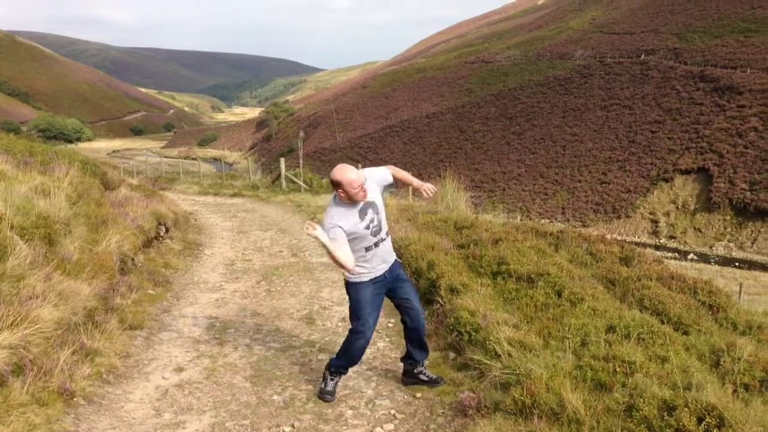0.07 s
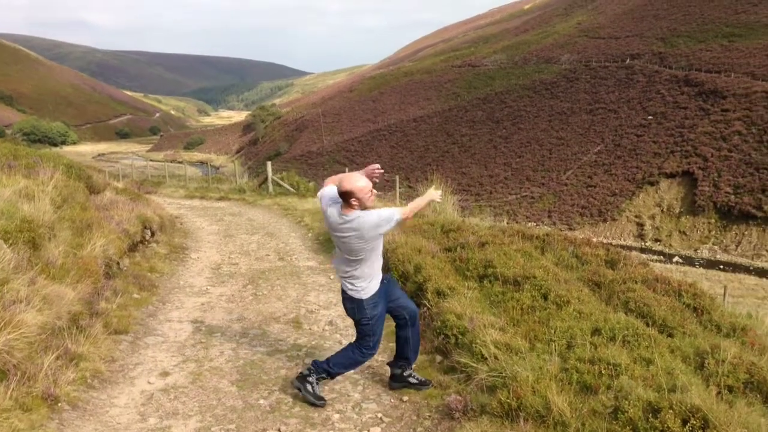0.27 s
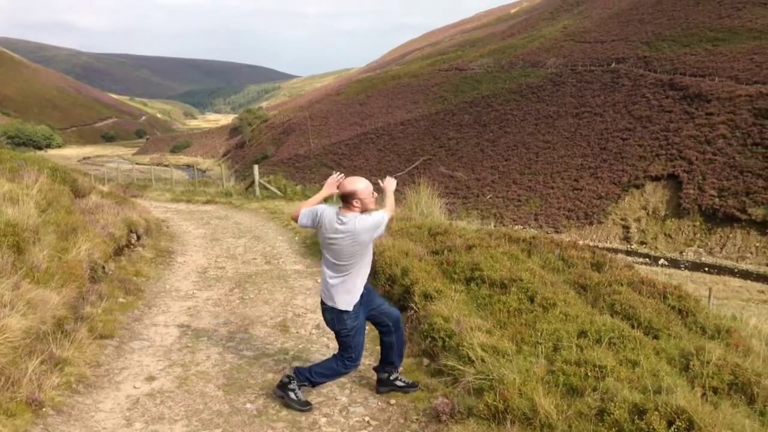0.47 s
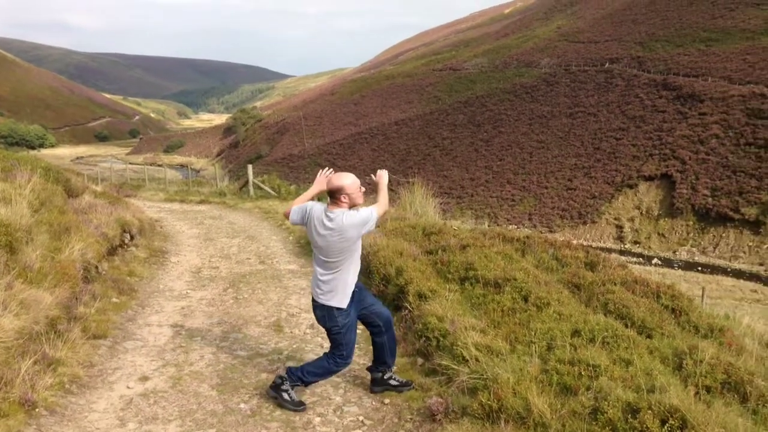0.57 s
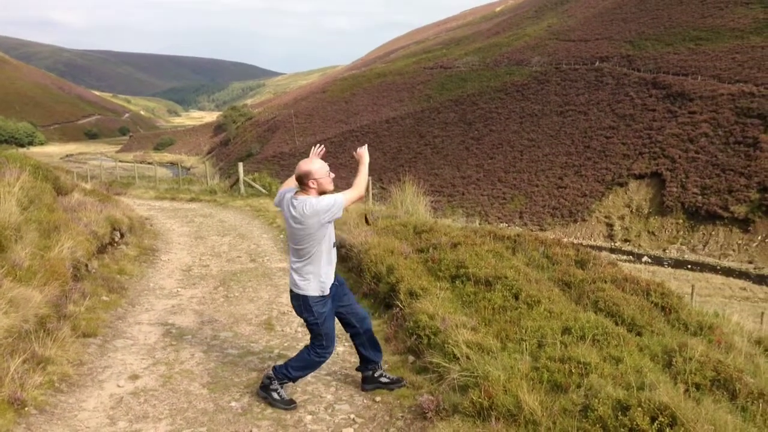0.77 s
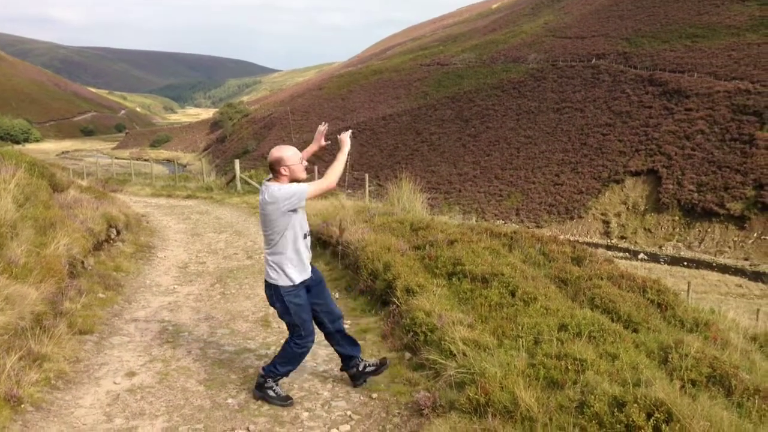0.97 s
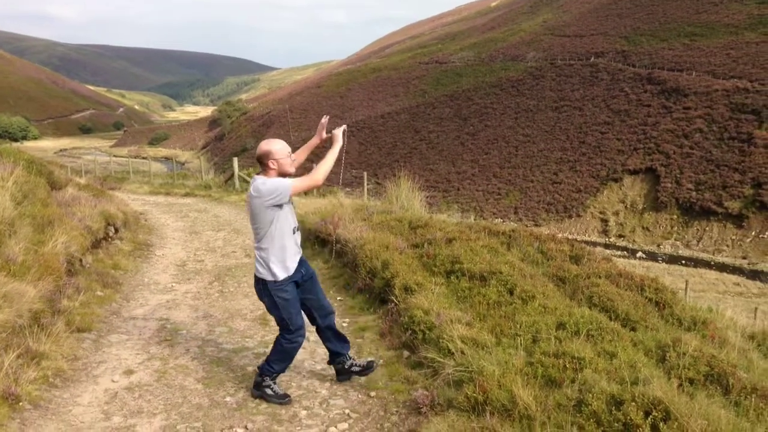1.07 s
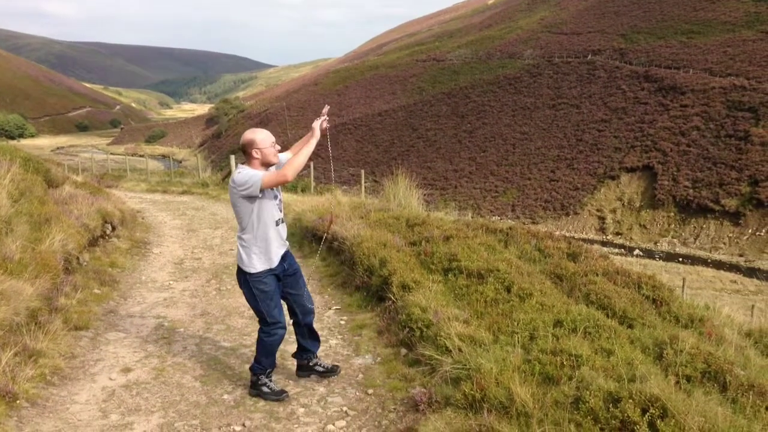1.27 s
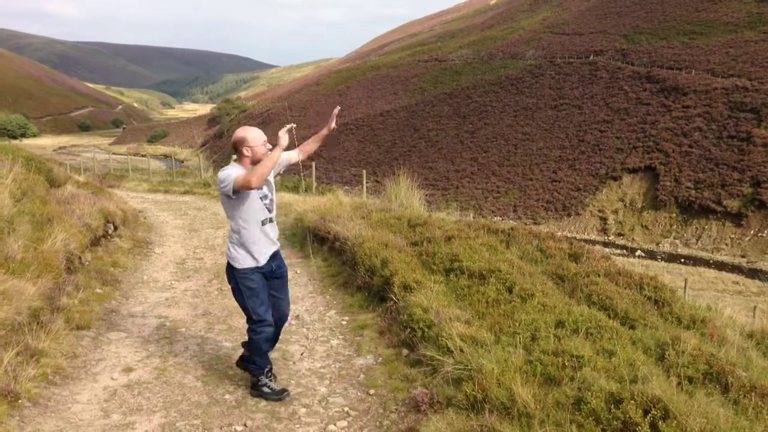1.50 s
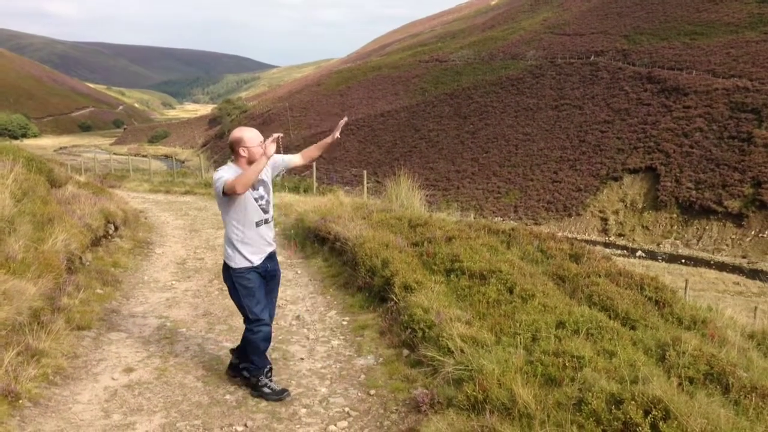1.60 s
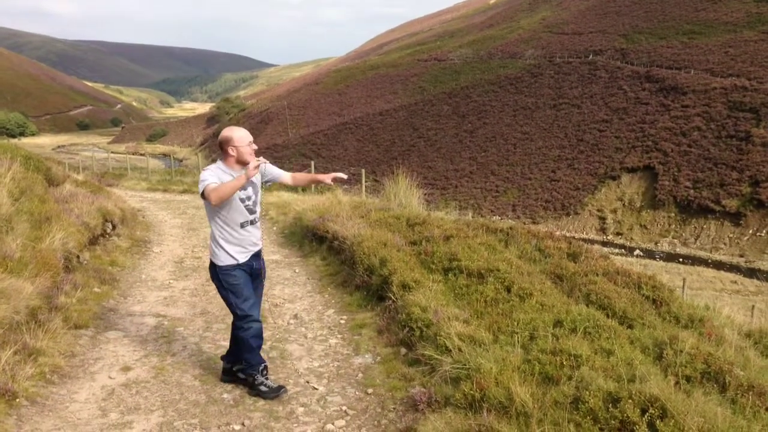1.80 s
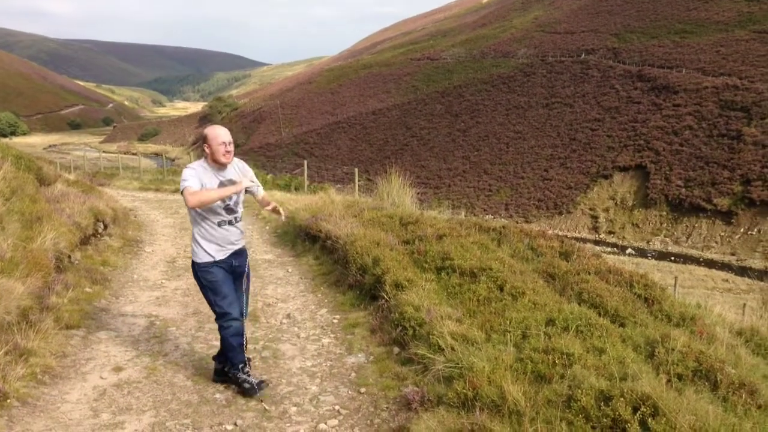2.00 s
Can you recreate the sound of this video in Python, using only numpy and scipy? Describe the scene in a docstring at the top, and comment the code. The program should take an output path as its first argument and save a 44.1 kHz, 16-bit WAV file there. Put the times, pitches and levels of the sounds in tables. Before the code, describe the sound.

The quick whoosh and sharp crack of a sling released outdoors in light wind.

```python
"""Wind hisses in the heather and rumbles low on an open moor, from start to end.
A few metres away a sling is whipped round once and let go. Its cords snap taut and rush through
the air, the pouch whooshes past, the freed cord hisses and, a third of a second in, its tip cracks.
The ground and slopes scatter these sounds. Later, stones knock twice and the wind gusts."""
import sys
import numpy as np
from scipy import signal
from scipy.fft import rfft, irfft
from scipy.io import wavfile

SR = 44100
rng = np.random.default_rng(int(sys.argv[2]) if len(sys.argv) > 2 else 0)


def materialize(psi):
    """Save the field psi as 16-bit PCM at rate SR to the path in sys.argv[1].

    A 1-D psi becomes a single channel; in a 2-D psi each row is a channel.
    """
    bounded = np.clip(np.atleast_2d(psi).T, -1, 1)
    quanta = np.round(bounded * 32767).astype(np.int16)
    wavfile.write(sys.argv[1], SR, quanta)


N = 90404
T = np.arange(N) / SR
SIZE = 2 * N
FREQ = np.maximum(np.arange(N + 1) * SR / SIZE, 1)


def undb(db):
    """Turns decibels into a gain to multiply by."""
    return 10 ** (np.asarray(db) / 20)

def colour(points):
    """Tone colour: a gain for every frequency, from rows of f/Hz, level/dB."""
    hz, db = np.array(points, float).T
    return undb(np.interp(np.log(FREQ), np.log(hz), db))

def band(hz, octaves):
    """A colour that keeps only what is near one pitch."""
    return 1 / (1 + (np.log2(FREQ / hz) / octaves) ** 2) ** 2

def low_cut(hz):
    """A colour that removes the bass."""
    return 1 / (1 + (hz / FREQ) ** 4)

def noise(gain):
    """Coloured noise, scaled to level 1."""
    x = irfft(rfft(rng.standard_normal(SIZE)) * gain)[:N]
    return x / x.std()

def ring(x, gain):
    """Colours a sound so that it rings after each push, never before."""
    cepstrum = irfft(np.log(gain + 1e-9))
    cepstrum[1:N] *= 2
    cepstrum[N + 1:] = 0
    return irfft(rfft(x, SIZE) * np.exp(rfft(cepstrum)))[:N]

def wobble(hz):
    """A smooth random wobble; more Hz is faster."""
    return noise(np.exp(-(FREQ / hz) ** 2))

def pulse(at):
    """One sharp push."""
    return 1. * (np.arange(N) == int(at * SR))

def burst(at, rise_s, fade_s):
    """A level that rises to a point and fades."""
    return np.exp(-np.maximum((at - T) / rise_s, (T - at) / fade_s))

def swell(at, half_s, steep=2):
    """The bell-shaped level of something flying past."""
    return np.exp(-.5 * np.minimum(np.abs((T - at) / half_s), 20) ** steep)


# colours of the heather's hiss and the low rumble: f/Hz, level/dB
HISS_COLOUR = [(240, -50), (400, -11.5), (560, -15.5), (715, -2.5), (987, 1), (1170, -1), (1340, -1),
               (1690, -2), (2290, -7), (3510, -5), (4160, -9.5), (5230, -21.5), (8400, -24.5),
               (13300, -26.5), (15500, -28)]
RUMBLE_COLOUR = [(25, -48), (50, -44), (80, -27.5), (100, -17.5), (120, -3.5), (140, 0.5), (175, -7.5),
                 (230, -13), (300, -21), (400, -23.5), (600, -37), (2500, -95)]
# how the gusts rise and fall: t/s, level/dB
GUST_LEVELS = [(0, -69), (.5, -64), (.8, -87), (1.15, -69), (1.38, -56.5), (1.51, -54), (1.58, -61.5),
               (1.7, -57.5), (1.88, -56.5), (2.05, -60)]

def wind():
    """Wind hisses evenly in the heather over a fluttering rumble; gusts add a higher band."""
    hiss = noise(colour(HISS_COLOUR) * low_cut(300)) * undb(-58.5)
    rumble = noise(colour(RUMBLE_COLOUR)) * undb(-57.5 + 1.7 * wobble(11.7))
    gust_db = np.interp(T, *np.array(GUST_LEVELS).T)
    return hiss + rumble + noise(band(261.9, octaves=.27)) * undb(gust_db)


# small snaps: t/s, level/dB, brightness/(dB per octave), half the tail's fade time/s
CORD_SNAPS = [(.016, -53.5, 2, 0.005), (.042, -53, -0.5, 0.0036), (.2044, -28, 0, 0.00075),
              (0.2124, -42, 1.5, 0.00062), (0.2221, -37, 1, 0.0017), (0.2439, -47, -4.5, 0.0037),
              (.4025, -49, 7, .001)]
# their shared colour: f/Hz, level/dB
SNAP_COLOUR = [(300, -17), (700, -8), (1200, 2.5), (2300, 2), (3200, -13), (3900, -1), (5800, -29),
               (7500, -14), (9000, -28), (15000, -21)]

def snaps():
    """Cord and gear snap taut, each time with a click and a short gritty tail."""
    out = 0
    for at, db, brightness, half_fade in CORD_SNAPS:
        gain = colour(SNAP_COLOUR) * undb(brightness * np.log2(FREQ / 2000)) * low_cut(300)
        gain /= np.sqrt(np.mean(gain ** 2))
        click = pulse(at) * np.sqrt(half_fade * SR)
        grit = .69 * rng.standard_normal(N) * burst(at, half_fade / 10, 2 * half_fade)
        out += undb(db) * ring(click + grit, gain)
    return out


# rushes of air: middle t/s, half length/s, edge steepness, level/dB,
# top edge f/Hz, fall above it/(dB per octave), bottom edge f/Hz
AIR_RUSHES = [(0.194, 0.066, 1.1, -56.5, 2470, 13, 700), (0.223, 0.021, 2.4, -49, 2210, 8.5, 610),
              (0.27, 0.0074, 1.6, -40, 2200, 15.5, 700), (0.3, 0.023, 2.3, -44, 2500, 6, 350)]
# colour of the freed cord's lash: f/Hz, level/dB
LASH_COLOUR = [(90, -24), (160, 4), (300, 2), (560, -9), (1000, 1.5), (1550, 3), (2100, -14), (2550, -2),
               (3150, -8), (5500, -1), (6700, -8.5), (10800, -12), (15000, -15)]

def cords():
    """Air swirls behind the cords; they sizzle as they pull tight, then the freed end lashes."""
    rushes = 0
    for at, half_s, steep, db, top_hz, fall, bottom_hz in AIR_RUSHES:
        high_cut = undb(-fall * np.log2(np.hypot(1, FREQ / top_hz)))
        rushes += undb(db) * swell(at, half_s, steep) * noise(high_cut * low_cut(bottom_hz))
    sizzle = undb(-57.5) * swell(at=.221, half_s=.023, steep=4) * noise(band(7340, octaves=.13))
    lash = undb(-33) * swell(at=.3015, half_s=.0065, steep=3.9) * noise(colour(LASH_COLOUR))
    return rushes + sizzle + lash


def pouch(at=.2685, pitch_hz=945, octaves_per_s=-2):
    """Whirls of air peel off the pouch, making a shaky, sinking tone inside a breathy wake."""
    glide = 2 ** (octaves_per_s * np.clip(T - at, -.1, .1))
    hz = pitch_hz * glide * (1 + .041 * wobble(210))
    tone = np.sqrt(2) * np.sin(2 * np.pi * np.cumsum(hz) / SR)
    tone *= undb(-36 + 1.1 * wobble(180))
    wake = undb(-48) * noise(band(900, octaves=.23))
    return tone * swell(at, half_s=.0062) + wake * swell(at, half_s=.0079)


# colours of the tip's crack and the frayed end's fizz: f/Hz, level/dB
CRACK_COLOUR = [(30, -28.5), (90, -19), (125, 0), (210, 6), (310, -1), (420, -0.5), (750, -1), (1150, -16),
                (1750, -9.5), (2150, -26), (2750, -19), (3300, -11.5), (4500, -11.5), (5200, -27),
                (6500, -27), (8000, -18.5), (15000, -36)]
FIZZ_COLOUR = [(200, 1), (800, 2), (4000, -3.5), (7000, -4.5), (15000, -9)]

def crack(at=.3253, bounce_delay_s=.0042):
    """The tip makes a shock wave that bounces dully off the ground; the frayed end fizzes."""
    shock = -undb(13) * ring(pulse(at), colour(CRACK_COLOUR))
    delayed = np.roll(shock, int(bounce_delay_s * SR))
    bounce = ring(delayed, undb(-12) / np.hypot(1, FREQ / 700))
    fizz = undb(-25) * burst(at, rise_s=.001, fade_s=.0021) * noise(colour(FIZZ_COLOUR))
    return shock + bounce + fizz


# colours of the echoes from the nearby ground and the far slopes: f/Hz, level/dB
GROUND_COLOUR = [(80, -17), (200, -12.5), (380, -6), (600, -16), (1500, -14), (5000, -9), (15000, -11)]
SLOPE_COLOUR = [(80, -24), (150, -14.5), (250, -6), (400, -15.5), (600, -19.5), (1500, -17.5),
                (5000, -17.5), (15000, -12.5)]

def scatter(sound, ground_fade_s=.015, slope_fade_s=.091):
    """Many tiny echoes blur together, so each octave lingers as fading noise."""
    out = 0
    for points, fade_s in (GROUND_COLOUR, ground_fade_s), (SLOPE_COLOUR, slope_fade_s):
        spectrum = rfft(sound, SIZE) * colour(points)
        keep = np.exp(-2 / (fade_s * SR))  # share of energy left after one sample
        for hz in 125 * 2. ** np.arange(8):
            octave = np.cos(np.pi / 2 * np.clip(np.log2(FREQ / hz), -1, 1))
            energy = irfft(spectrum * octave)[:N] ** 2
            lingering = signal.lfilter([1 - keep], [1, -keep], energy)
            out += np.sqrt(lingering) * noise(octave * colour(points))
    return out


# knocks of stones: t/s, level/dB
STONE_KNOCKS = [(1.131, -18), (1.4078, -29)]
# their colour: f/Hz, level/dB
STONE_COLOUR = [(300, -27), (550, -13), (800, 3.5), (1500, -1.5), (3400, -1.5), (4300, -12), (5200, -24),
                (6400, -20), (7500, -34), (15000, -38)]

def stones():
    """Stone hits stone with a dull click and a little grit after it."""
    push = 0
    for at, db in STONE_KNOCKS:
        grit = .081 * rng.standard_normal(N) * burst(at, rise_s=.00045, fade_s=.0056)
        push += undb(db) * (pulse(at) + grit)
    return ring(push, colour(STONE_COLOUR))


def scene():
    """Adds the throw, its echoes, the stones and the wind into one channel."""
    sling = snaps() + cords() + pouch() + crack()
    return (sling + scatter(sling) + stones() + wind())[None]

def record(dry, top_hz=15250):
    """Cuts off the very highest treble."""
    return signal.sosfilt(signal.ellip(10, .2, 80, top_hz, fs=SR, output="sos"), dry)


dry = scene()
out = record(dry)
materialize(out)
```